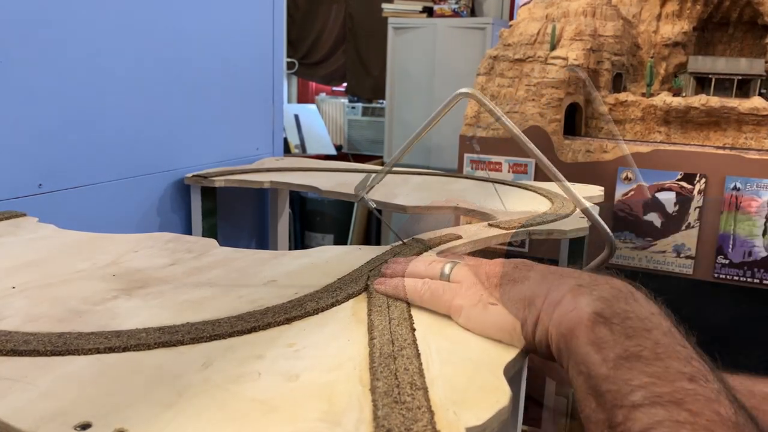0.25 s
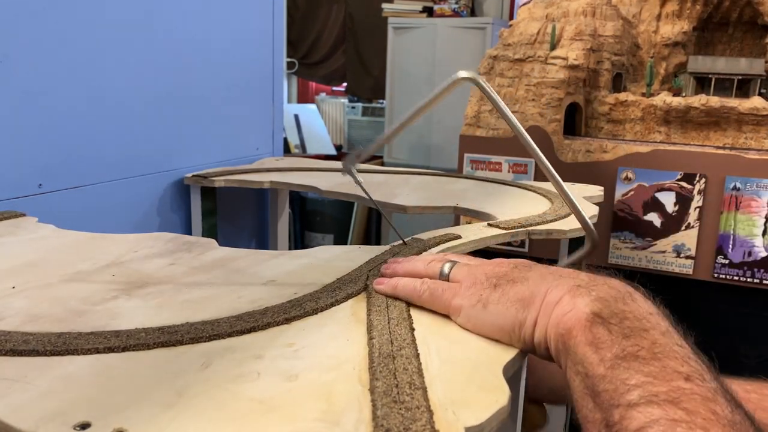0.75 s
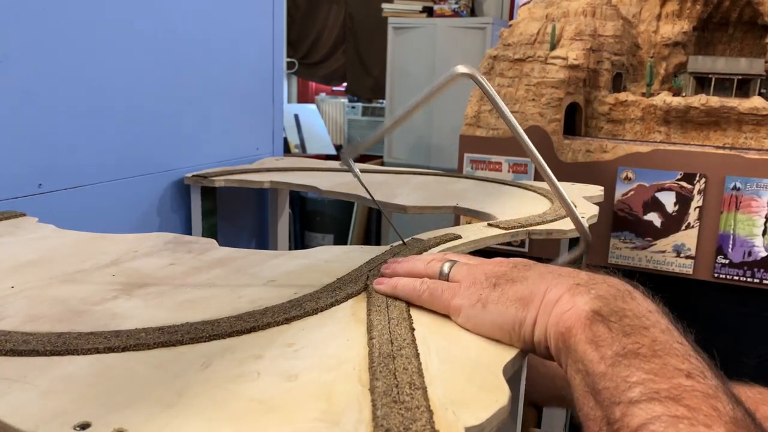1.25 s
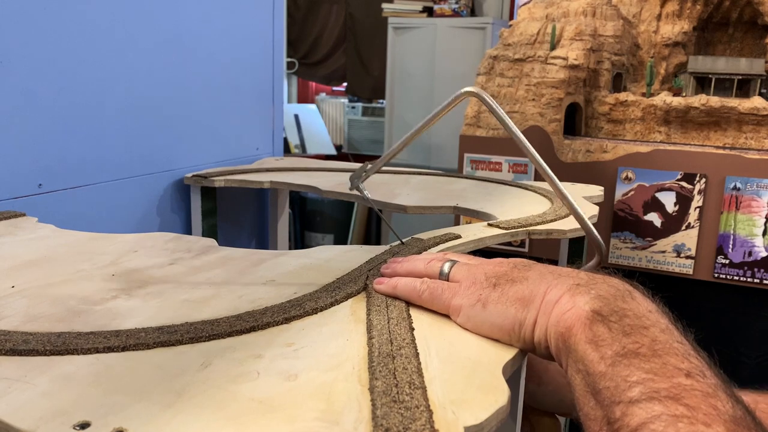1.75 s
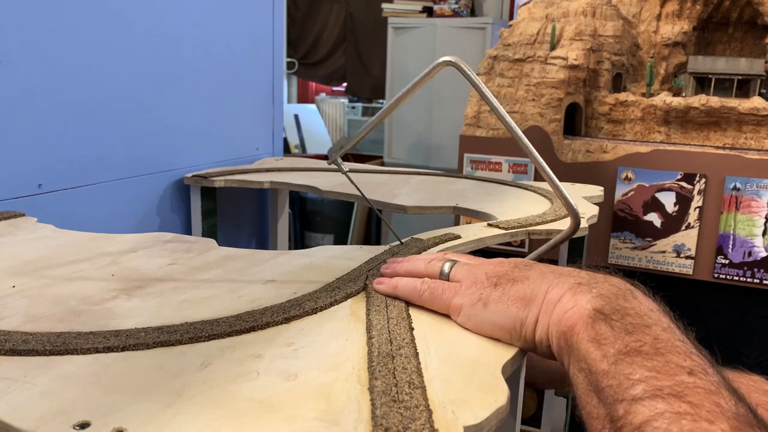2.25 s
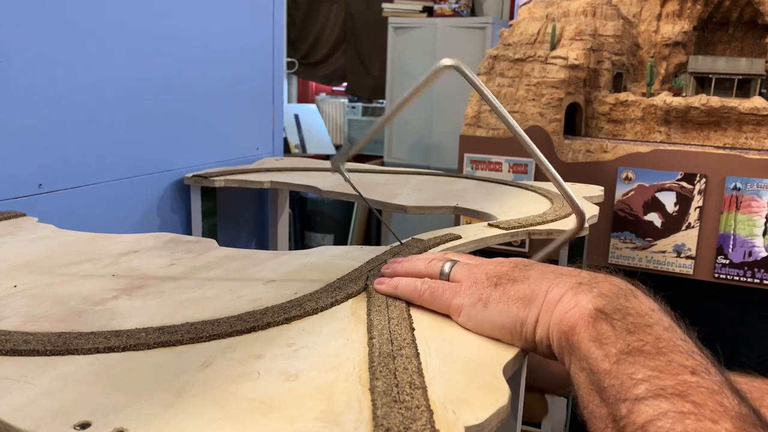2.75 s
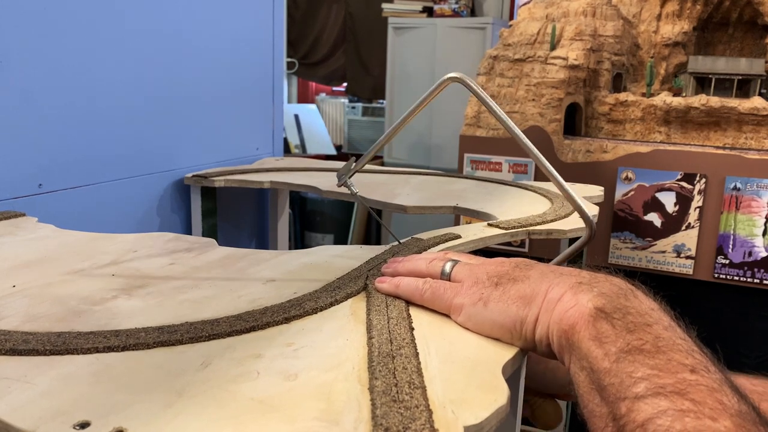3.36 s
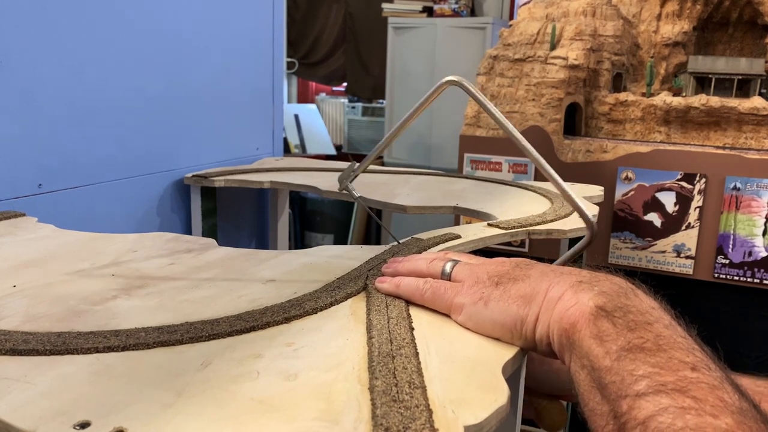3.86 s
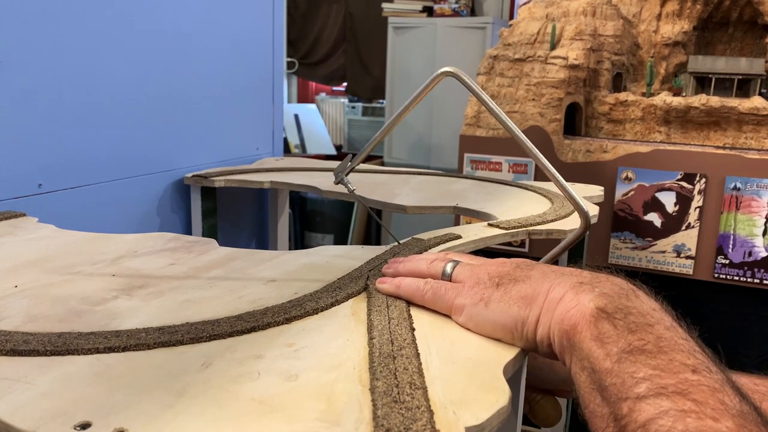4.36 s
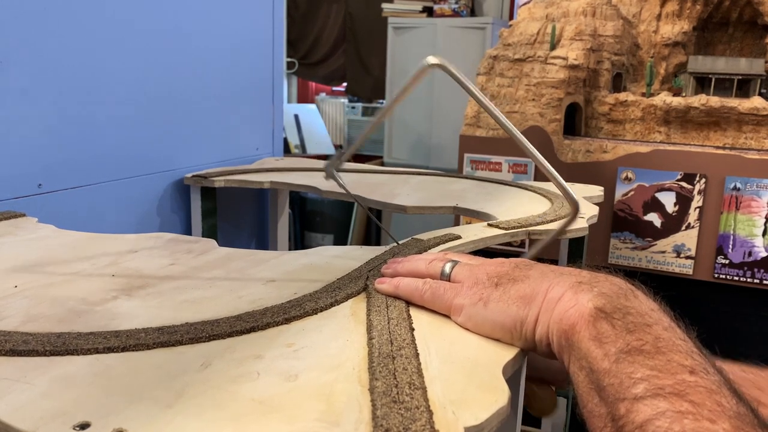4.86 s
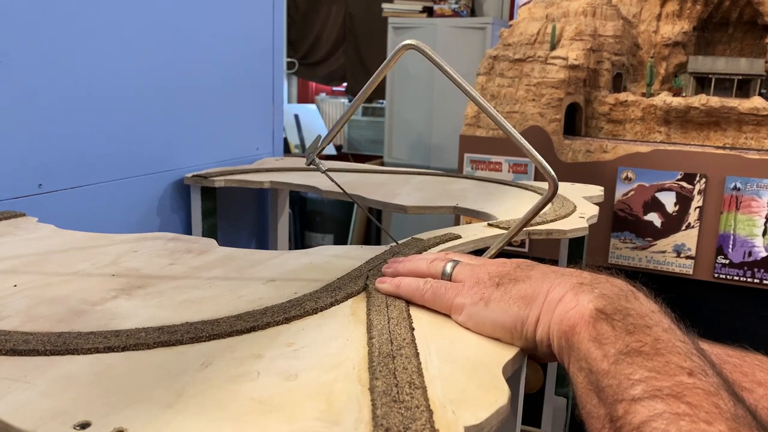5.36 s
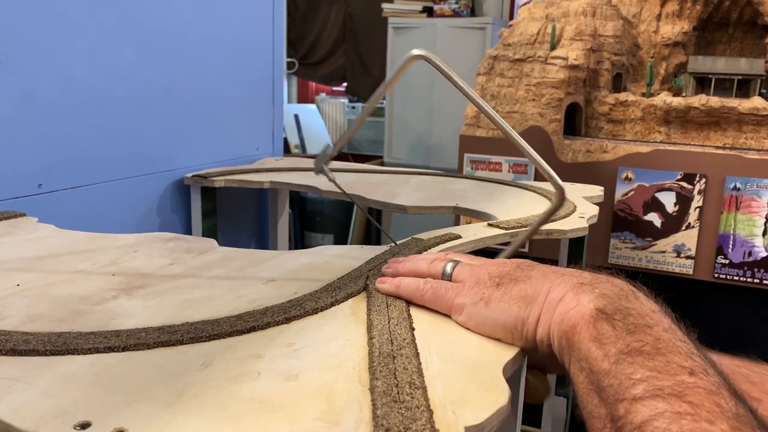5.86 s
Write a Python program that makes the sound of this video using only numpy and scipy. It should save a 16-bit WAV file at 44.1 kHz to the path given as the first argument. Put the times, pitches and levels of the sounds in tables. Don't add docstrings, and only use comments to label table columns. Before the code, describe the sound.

Steady coping-saw strokes, each a swelling gritty rasp: a loud push with hollow board tone and fizzing fibres, then a weaker, darker drag back. Strokes are short early and longer and slower later. Small metallic ticks come at some reversals, the sharpest near the end, with a soft bump early and a harder one late. Heard close in a small room, little echo, slight hiss.

```python
import sys
import numpy as np
from scipy import signal
from scipy.fft import rfft, irfft, next_fast_len
from scipy.io import wavfile

SR = 44100
rng = np.random.default_rng(int(sys.argv[2]) if len(sys.argv) > 2 else 0)


def how_loud(loudness_db):
    steps = np.asarray(loudness_db, float) / 20
    return 10 ** steps


def transcribe(u):
    v = np.clip(np.atleast_2d(u).T, -1, 1)
    q = np.round(v * 32767).astype(np.int16)
    wavfile.write(sys.argv[1], SR, q)


N = 269430

# start t/s, length t/s, board peak level/dB, bite/dB, lean (under 1: fastest early)
PUSHES = [(-0.026, 0.25, -37.5, 1.1, 0.72), (0.148, 0.32, -40.5, 6.5, 0.88), (0.579, 0.25, -35, 3.3, 0.71),
          (0.926, 0.25, -32.5, 1, 0.76), (1.274, 0.24, -34, 0.5, 0.81), (1.626, 0.26, -32.5, -0.5, 0.84),
          (1.992, 0.23, -36, 0.5, 0.85), (2.388, 0.23, -33, -3.1, 0.83), (2.789, 0.24, -32.5, -3.4, 0.73),
          (3.24, 0.25, -35, -1.4, 0.66), (3.692, 0.3, -34, -1, 0.68), (4.194, 0.35, -35, -2, 0.87),
          (4.814, 0.37, -36, -1.5, 0.78), (5.503, 0.4, -35, 1.7, 0.62)]
PULLS = [(0.339, 0.34, -46, 10, 1), (0.718, 0.3, -43.5, 7, 1.11), (1.088, 0.25, -39, 3, 0.9),
         (1.422, 0.28, -38.5, -3.2, 1.1), (1.762, 0.3, -43, -2, 1.62), (2.152, 0.28, -41, -4.5, 1.22),
         (2.561, 0.29, -43.5, -3.5, 0.88), (2.958, 0.3, -42.5, 0.2, 1.16), (3.416, 0.32, -45, -2.5, 1.036),
         (3.895, 0.37, -44.5, 0.3, 0.88), (4.446, 0.32, -39.9, -7, 1.04), (4.712, 0.2, -63.5, 9, 0.61),
         (5.082, 0.39, -44, -3.8, 0.89), (5.755, 0.43, -41, -0.4, 0.86)]
# level re board/dB, share of bite, start as share of stroke,
# length as share of stroke, power of speed
ON_PUSH = [
    (-0.5, 0.0, 0.0011, 0.91, 5.25),
    (-10.5, 0.72, 0.039, 0.72, 2.85),
    (-11.5, 0.78, 0.056, 0.66, 2.36),
    (-18.5, 0.45, 0.076, 0.63, 3),
]
ON_PULL = [
    (-1.5, 0.12, 0.0, 0.88, 5.2),
    (-11, 0.49, 0.11, 0.65, 2.1),
    (-16.5, 1.11, 0.045, 0.75, 3.5),
    (-22.5, 0.85, 0.095, 0.64, 2.2),
]
PART_LEANS = [1.013, 1.01, 1.058, 1.05]
# t/s, board tilt/(dB per octave), level of the finest sounds/dB
GRIP_SHIFTS = [(0.08, -2, -1.5), (0.5, -5, -3), (0.87, -1.5, -2.5), (1.2, -2.5, -2), (1.55, 1, .5),
               (1.93, -5, -0.5), (2.3, -.5, 1), (2.7, 2, -2), (3.1, 2.5, 2), (3.35, 4, 0.5),
               (3.58, -5.5, -3), (4.05, 2.5, -5.5), (4.35, -1, -4), (4.6, -2.5, -5), (4.95, 1, -2),
               (5.249, -3.5, 1.5), (5.65, -2, -2.5), (5.95, -7, 1)]
# t/s, frame level/dB, blade tilt/(dB per octave)
HAND_SHIFTS = [(0.078, -7.5, -2), (0.3, -4, -3), (0.5, .3, 1.5), (0.87, -0.7, -2.5), (1.2, -1.5, -5),
               (1.55, 1.3, -1.5), (1.75, 1, -4), (2.1, 1.4, -4), (2.3, 1.5, -4), (2.7, 0, .3),
               (3.1, 1.5, -12), (3.58, 3, 7.5), (4.05, 0, .3), (4.6, -1, 2), (4.97, 3, 1), (5.25, 2, 11.5),
               (5.65, -1.2, -3.5), (5.95, 2.2, 14)]
# f/Hz, width f/Hz, level/dB, change on the drag level/dB
BOARD_MODES = [(59, 4.4, 3.5, 4), (125.3, 6.7, -7, 2.5), (192.7, 5.6, -18, -17), (248.7, 11.7, 4.5, 3),
               (296.6, 17.1, 4.5, 3.5), (346.2, 24.4, 1, 5), (410, 17, -7, 2), (449.1, 26, 3, 6.5),
               (474.7, 53.6, 3.5, 0.5), (527, 29, 5.5, 1.5), (543.9, 27.3, 4, -0.5), (681.6, 26, -3.5, 1.5),
               (768, 30.4, -3, 5.5), (856, 62, -5, 4.5), (909.7, 24.6, -1.5, 4)]
FRAME_MODES = [(1210, 28, -5, -3), (1396, 24, -3.5, -2), (1581, 13, -8.5, -4), (1653, 30, -7, 2.5),
               (1914, 37.5, -7, -3), (2017, 30, -4, -2), (2234, 59, -1, 0.5), (2486, 75, -6.5, -1.5),
               (2598, 61, -4.5, -1.5)]
BLADE_MODES = [(3160, 140, 0, -3.5), (3693, 98, 0, -1.5), (4597, 320, 5.5, -2), (4742, 315, 5, -1.5),
               (5390, 1200, -4.5, -6), (6250, 660, 1.5, -4.5)]
FIBRE_MODES = [(7760, 3300, -5.5, -19), (8690, 390, -5.5, -15), (10330, 1300, 3.5, -13.5),
               (12150, 1200, -26, -16), (13100, 1900, 5.5, -5)]
# f/Hz, level/dB
HISS_SHAPE = [(88, -32), (150, -7.5), (406, -2), (1640, -13.5), (2540, -17), (3020, -17.5), (5900, -12),
              (6490, -20), (7150, -16.5), (14500, -20)]
# t/s, peak level/dB, frame knock level/dB
TICKS = [(0.185, -44, -1), (0.611, -51, -15), (1.2346, -63, -15), (1.253, -51, 11), (1.3016, -41.5, 12.5),
         (2.0018, -56, -18), (2.3685, -53, -11), (2.735, -43.5, -23), (2.7537, -46, -17), (2.778, -52.5, 1),
         (3.191, -57, 3), (3.6693, -38.5, -16), (3.683, -54, -7), (3.6954, -50, -11), (3.849, -39.5, 17),
         (3.8686, -46, -9), (3.8994, -56, -15), (3.9185, -62, -15), (3.93, -58, -5), (4.1624, -56, -20),
         (4.18, -54.5, -4), (4.7052, -59.5, 4), (4.7636, -67, -5), (4.826, -56, -15), (5.1023, -65, 10),
         (5.464, -66, 2), (5.852, -51, -9), (5.979, -33.5, 6), (6.068, -72, -4), (6.087, -68, -7)]
# t/s, peak level/dB, ring T60 t/s, frame knock level/dB
BUMPS = [
    (0.9004, -57, 0.031, 17),
    (5.313, -44, 0.073, 16.5),
]
# f/Hz, width f/Hz, level/dB
PIN_MODES = [(4880, 590, -1), (6290, 650, -1.5), (10200, 1000, -47), (13200, 5900, -17)]
KNOCK_MODES = [(1630, 470, -3.5), (2440, 1930, -8.5), (3640, 900, -7.7)]

TILT_PUSH_DB, TILT_PULL_DB, TILT_REST_DB = 1, 2, -13.5
TILT_PER_BITE = 0.17
TILT_TRAVEL_DB, PULL_TRAVEL_DB = -3.5, 1
STEADY_PUSH, STEADY_PULL = 0.73, 0.73
TICK_T60_S, SHOP_T60_S = 0.048, 0.22
HISS_DB = -79.5
BASS_CUT_HZ, TOP_CUT_HZ = 187, 15100


def rms_one(x):
    return x / np.sqrt(np.mean(x ** 2) + 1e-20)


def band(x, low_hz, high_hz):
    return signal.sosfilt(signal.butter(2, [low_hz, high_hz], "band", fs=SR, output="sos"), x)


def ring(x, hz, width):
    r = np.exp(-np.pi * width / SR)
    feedback = [1, -2 * r * np.cos(2 * np.pi * hz / SR), r * r]
    return signal.lfilter([(1 - r * r) / 2, 0, (r * r - 1) / 2], feedback, x)


def drift(rate):
    r = np.exp(-64 * np.pi * rate / SR)
    noise = rng.standard_normal(N // 32 + 1002)
    slow = signal.lfilter([1], [1, -2 * r, r * r], noise)[1000:]
    return np.interp(np.arange(N) / 32, np.arange(len(slow)), rms_one(slow))


def strokes():
    start, length, peak_db, bite_db, lean = np.transpose(PUSHES + PULLS)[:, :, None]
    pull = np.repeat([0, 1], [len(PUSHES), len(PULLS)])[:, None]
    done = (np.arange(0, N + 32, 32) / SR - start) / length
    steady = np.where(pull, STEADY_PULL, STEADY_PUSH)
    gains, speeds = [], []
    for *laws, lean_factor in zip(ON_PUSH, ON_PULL, PART_LEANS):
        part_db, share, begins, lasts, power = np.transpose(laws)[:, pull]
        part_done = np.clip((done - begins) / lasts, 0, 1)
        swing = np.abs(np.sin(np.pi * part_done ** (lean_factor * lean)))
        speed = np.tanh(steady * swing) / np.tanh(steady) + 1e-4
        speeds.append(speed)
        gains.append(how_loud(peak_db + part_db + share * bite_db) * speed ** power)
    weight = gains[1] / gains[1].sum(0)
    travel = 2 * np.clip(done, 0, 1) - 1
    tilt_db = np.where(pull, TILT_PULL_DB, TILT_PUSH_DB) + TILT_REST_DB * (1 - speeds[0])
    tilt_db = tilt_db + TILT_PER_BITE * bite_db + (TILT_TRAVEL_DB + PULL_TRAVEL_DB * pull) * travel
    controls = [20 * np.log10(g.sum(0)) for g in gains]
    controls += [(weight * c).sum(0) for c in (pull, travel, tilt_db)]
    return [np.interp(np.arange(N) / 32, np.arange(len(c)), c) for c in controls]


def tearing(per_s, spread_db, catch_db):
    sizes = how_loud(spread_db * np.minimum(rng.exponential(1, N), 4)) * rng.choice([-1, 1], N)
    breaks = rng.random(N) < per_s / SR
    return rms_one(sizes * breaks * how_loud(catch_db * drift(82)))


def body(blows, level_db, drag, modes, low_hz, high_hz, between_db, drag_db, patchy_db, tilt_db=0, count=1):
    x = blows * how_loud(level_db)
    wash_db = between_db + drag_db * drag + patchy_db * drift(19.5)
    out = band(x * how_loud(wash_db), low_hz, high_hz)
    power = np.mean((how_loud(between_db) * band(blows, low_hz, high_hz)) ** 2)
    for k, (hz, width, mode_db, change_db) in enumerate(modes):
        octaves = np.log2(max(hz, low_hz) ** 2 / (low_hz * high_hz)) / 2
        coupling_db = mode_db + change_db * drag + tilt_db * octaves + patchy_db * drift(10.3)
        delay = count // 2 * 23 * (k + 1)
        pair = np.array([np.roll(x * how_loud(coupling_db), delay), blows * how_loud(mode_db)])
        for _ in range(count):
            pair = ring(pair, hz, width)
        out += (-1) ** k * pair[0]
        power += np.mean(pair[1] ** 2)
    steep = signal.butter(6, 1.201 * high_hz, fs=SR, output="sos")
    return signal.sosfilt(steep, out) / np.sqrt(power)


def saw():
    board_db, frame_db, blade_db, fibre_db, drag, travel, tilt_db = strokes()
    now = np.arange(N) / SR
    s, *grip = np.transpose(GRIP_SHIFTS)
    grip_tilt_db, kerf_db = [np.interp(now, s, c) for c in grip]
    s, *hand = np.transpose(HAND_SHIFTS)
    free_db, blade_tilt_db = [np.interp(now, s, c) for c in hand]
    blade_tilt_db = blade_tilt_db + 7.8 * drag * travel
    teeth = tearing(per_s=900, spread_db=2.0, catch_db=0.0)
    dust = tearing(per_s=6000, spread_db=4.0, catch_db=1.0)
    crackle = tearing(per_s=3900, spread_db=1.0, catch_db=2.5)
    board = body(teeth, board_db, drag, BOARD_MODES, 250, 1312,
                 between_db=-14, drag_db=1, patchy_db=2.5, tilt_db=tilt_db + grip_tilt_db)
    frame = body(teeth + 1.33 * dust, frame_db + free_db, drag, FRAME_MODES, 1050, 2433,
                 between_db=-17.5, drag_db=0.0, patchy_db=3.0)
    blade = body(0.23 * teeth + dust, blade_db + 0.76 * kerf_db, drag, BLADE_MODES, 2980, 5540,
                 between_db=-7.5, drag_db=-5.5, patchy_db=3.5, tilt_db=blade_tilt_db, count=2)
    fibres = body(crackle + 0.75 * dust, fibre_db + kerf_db, drag, FIBRE_MODES, 8400, 10900,
                  between_db=-14, drag_db=-20, patchy_db=2.5, tilt_db=0.71 * kerf_db, count=2)
    return board + frame + blade + fibres


def hiss():
    hz = np.arange(N // 2 + 1) * SR / N + 1
    points_hz, points_db = np.transpose(HISS_SHAPE)
    shape = how_loud(np.interp(np.log(hz), np.log(points_hz), points_db))
    return how_loud(HISS_DB) * rms_one(irfft(rfft(rng.standard_normal(N)) * shape, N))


def workshop(x):
    size = next_fast_len(N + SR)
    w = 2 * np.pi * np.arange(size // 2 + 1) / size
    lags = rng.uniform(0.011, 0.054, 10) * SR
    loops = [how_loud(-60 * lag / SR / SHOP_T60_S) * np.exp(-1j * w * lag) for lag in lags]
    tail = sum(g / (1 - g) for g in loops) / (1 + 1j * w * SR / (2 * np.pi * 3000))
    return irfft(rfft(x, size) * tail, size)[:N]


def resonate(x, modes):
    return sum((-1) ** k * how_loud(level_db) * ring(x, hz, width)
               for k, (hz, width, level_db) in enumerate(modes))


def ticks():
    pin, knock = np.zeros(N + SR), np.zeros(N + SR)
    age = np.arange(SR // 8) / SR
    events = [(s, peak_db, TICK_T60_S, knock_db) for s, peak_db, knock_db in TICKS] + BUMPS
    for s, peak_db, t60, knock_db in events:
        noise = rng.standard_normal(len(age)) * np.minimum(age / 0.0016, 1)
        burst = noise * how_loud(peak_db + 2.5 - 60 * age / t60)
        first = round(s * SR)
        pin[first:first + len(age)] += burst
        knock[first:first + len(age)] += burst * how_loud(knock_db)
    return resonate(pin[:N] + 1e-18, PIN_MODES) - resonate(knock[:N] + 1e-18, KNOCK_MODES)


def scene():
    near = saw() + ticks()
    return (near + how_loud(-24.5) * workshop(near) + hiss())[None]


def top_cut(x):
    return signal.sosfilt(signal.butter(12, 14780, fs=SR, output="sos"), x)


def record(dry):
    x = signal.sosfilt(signal.butter(4, BASS_CUT_HZ, "high", fs=SR, output="sos"), dry)
    x = signal.sosfilt(signal.cheby2(12, 60, TOP_CUT_HZ, fs=SR, output="sos"), x)
    return top_cut(x)


dry = scene()
out = record(dry)
transcribe(out)
```